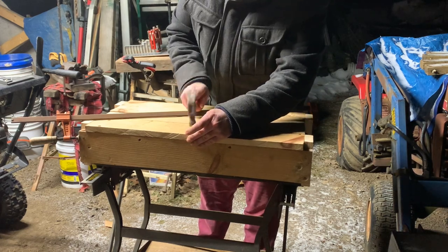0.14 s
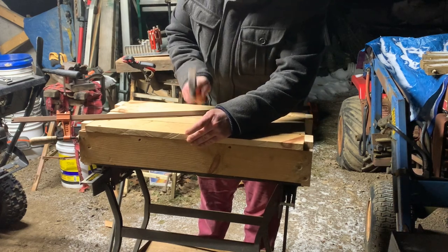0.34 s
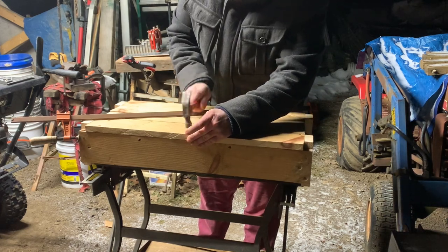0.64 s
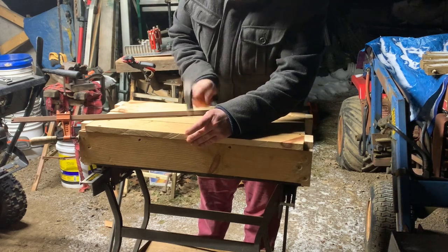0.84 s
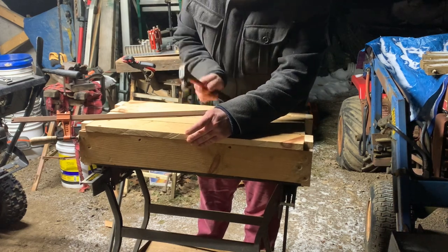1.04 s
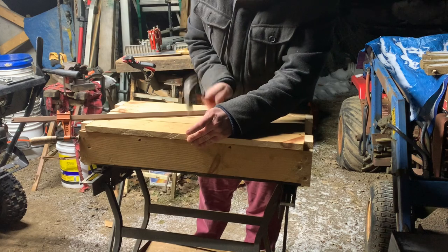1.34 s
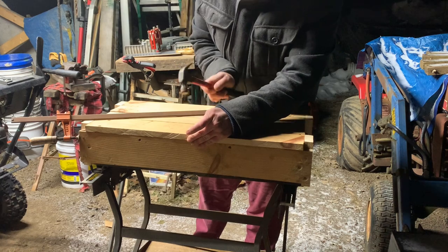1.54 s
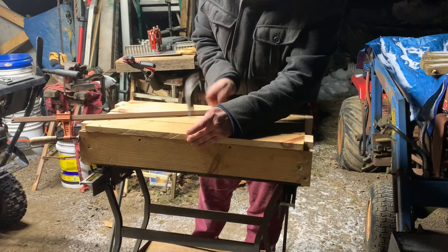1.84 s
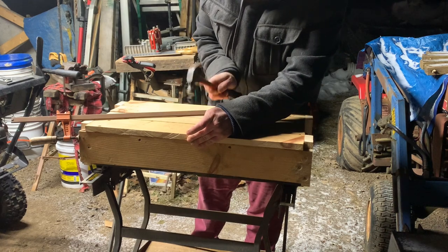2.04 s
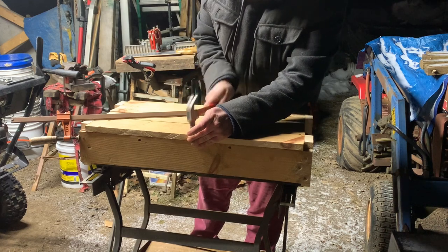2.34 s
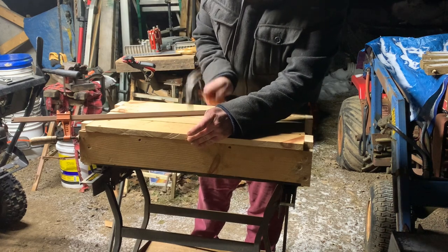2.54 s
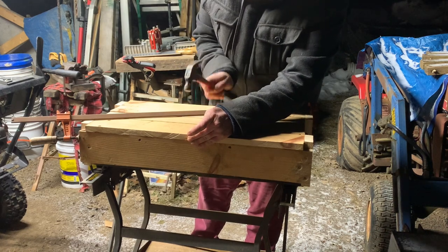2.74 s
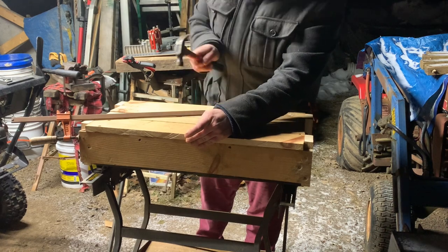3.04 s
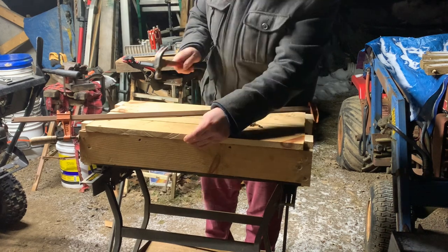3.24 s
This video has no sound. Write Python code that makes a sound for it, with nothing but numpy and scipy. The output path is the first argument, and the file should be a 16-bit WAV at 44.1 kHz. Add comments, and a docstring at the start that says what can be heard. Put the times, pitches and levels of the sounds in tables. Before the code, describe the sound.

A hammer drives a nail into wooden boards with rapid, loud, steady knocks in a garage.

```python
"""In a garage, one microphone hears quiet air, bench rumble and the tail of a blow struck just before.
A hammer drives a nail into boards on a folding workbench, four blows a second: shaped noise for the steel
crack, dying sines for the wood and the garage's resonances, a bench rebound, and decaying noise for the echo.
Between blows the rocking boards bump; as the nail sinks the knock gives way to a deep thud.
After the last blows loose hardware ticks and the rumble dies; a limiter holds the peaks throughout."""
import sys
import numpy as np
from scipy import signal
from scipy.fft import rfft, irfft
from scipy.io import wavfile
from scipy.ndimage import uniform_filter1d

SR = 44100
rng = np.random.default_rng(int(sys.argv[2]) if len(sys.argv) > 2 else 0)


def wav_out(sig):
    """Save sig, one row per channel (or a flat mono array), as 16-bit PCM at SR to the path in sys.argv[1]."""
    wavfile.write(sys.argv[1], SR, np.round(np.clip(np.atleast_2d(sig).T, -1, 1) * 32767).astype(np.int16))


N = 149940  # samples in the scene
LENGTH = 32768  # samples in one sound
T = np.arange(LENGTH) / SR

# Background spectra, relative: frequency_hz, level_db
AIR_SPECTRUM = [(20, -17.5), (55, -4.5), (120, -10), (300, -11), (500, -12.5), (700, -20.5), (1200, -19.5),
                (2500, -27), (4500, -29), (7200, -31), (8500, -49.5), (16000, -68)]
RUMBLE_SPECTRUM = [(20, -21), (40, -13.5), (58, 1), (100, -3.5), (200, -13.5), (400, -24), (1000, -32),
                   (4000, -54)]
AIR_DB, RUMBLE_DB = -58, -43  # rms levels, the rumble's before its fade
RUMBLE_END_S, RUMBLE_FADE_S = 2.91, 0.19

# Hammer blows: start_s, rebound_db, rebound_hz, then the tone of the blow at the six BLOW_TONE_HZ:
# thud_db, body_db, knock_db, clack_db, crack_db, tick_db
BLOWS = [(-.11, -70, 302, 4, -10, 1, -0.5, -5.5, -10), (0.14, -14, 408, 3, -2.5, 0.5, 0, -5, -6.5),
         (.3877, -28.5, 385, 3.5, -2, 1.5, 1.5, -5, -7.5), (0.622, -13, 278, 3, -2.5, 1.5, 2.5, -4, -10),
         (.8741, -15, 284, 0.5, -2.5, 1.5, 3.5, -8.5, -7), (1.1361, -15.5, 296, -1, -1.5, 1, 2, -10, -8),
         (1.375, -25, 322, 3, -2, 1, -0.5, -2.5, -12), (1.6257, -9.5, 342, 1, -3, -1.5, -0.5, -3.5, -4.5),
         (1.8738, -5, 370, 2.5, -3, -4.5, -2, -2.5, -3),
         (2.1146, -7, 327, 4.5, -3.5, -7.5, -2.5, -4.5, -1.5),
         (2.3485, -2, 308, 5.5, -3.5, -7, -4, -4, -0.5), (2.5814, -2.5, 301, 5.5, 0, -4.5, -3.5, -3.5, 1),
         (2.8119, -23.5, 361, 7.5, 6.5, 1, 4.5, -3, 0)]
# Where the tone of a blow is set: frequency_hz
BLOW_TONE_HZ = [300, 680, 1200, 2100, 6500, 9500]
LIKENESS = .85  # how much of its fine pattern a blow hands to the next, 0 to 1

# Colour of steel meeting the nail head: frequency_hz, gain_db
CRACK_COLOUR = [(100, -20.5), (500, -10.5), (1200, 4.5), (2100, 1.5), (3200, 7), (4500, 5), (6700, 9),
                (8300, 1), (10500, -3), (13000, -8), (16000, -14)]
# Strengths before that colour
CRACK_DB, CRACK_T60_S = 11, .011
SPLINTER_DB, SPLINTER_T60_S = 3, 0.061
# The first, duller reflection off the floor
FLOOR_ECHO_S, FLOOR_ECHO_DB, FLOOR_ECHO_HZ = .004, -2.5, 2520

# Modes of the nailed boards: pitch_hz, relative level_db, t60_s
WOOD_MODES = [(149.2, -28, 0.18), (268.7, -26, 0.12), (382.3, -24, .12), (507, -18, 0.042),
              (708.6, -14.5, 0.06), (932, -18.5, 0.032), (1198, -9, 0.043), (1501.6, -13.5, 0.042),
              (1769, -13, 0.031), (2187, -17, 0.023), (2540, -13.5, .025), (2906, -7.5, 0.021),
              (3910, -6.5, .02), (5467, -9.5, 0.015), (6864, -5, 0.01)]
WOOD_DB, WOOD_RISE_S = 1, .001

# Colour of the garage echo: frequency_hz, gain_db
ROOM_COLOUR = [(80, -6), (150, 5), (270, 19.5), (450, 21), (600, 18.5), (850, 19), (1180, 21.5),
               (1600, 17.5), (2200, 12), (3000, 13), (4500, 10.5), (7000, 8), (9000, 1), (12000, -9.5),
               (15500, -14.5)]
# Decay of the garage echo: frequency_hz, t60_s
ROOM_DECAY = [(150, .3), (400, 0.23), (1100, 0.16), (2800, 0.18), (7000, 0.16), (15000, 0.13)]
WALL_S, BUILD_S, NEAR_DB = .013, 0.0069, -9.5  # wall delay, build-up, and level before the walls answer
FADE_FROM_S = .032
LINGER_DB, LINGER_T60_S, LINGER_HZ = -25.5, 1, 4500  # faint long tail, weaker above LINGER_HZ
ROOM_DB, WOOD_ROOM_DB = 5, -33  # room gain for the blow and for its wood ring

# Resonances of the garage, narrow tones after each blow: pitch_hz, relative level_db, t60_s
GARAGE_MODES = [(382.6, -38.5, 0.62), (461, -22.5, 0.24), (691, -32, 0.18), (1158, -21.5, .25),
                (1105.6, -18.5, 0.17), (1265, -30.5, 0.37), (1442, -30, 0.09), (1518, -28, 0.12),
                (1883, -26.5, 0.2), (2670, -34.5, 0.083), (2927, -33, 0.25), (3240, -36, .19)]

# The bench rebounds after a blow: delay, half length, relative level and decay of its ring
REBOUND_S, REBOUND_WIDTH_S, REBOUND_RING_DB, REBOUND_T60_S = .0212, .0026, -14, 0.086
SWAY_DB, SWAY_HZ, SWAY_WIDTH_S = -21, 116, .009  # the heavy frame, level relative to the rebound

# Dull bumps of the rocking boards: start_s (centre of the push), level_db, pitch_hz
BUMPS = [(0.086, -39, 190), (.362, -29, 141), (.378, -29, 231), (.598, -24, 126), (.614, -28, 316),
         (.735, -30, 127), (.772, -31, 150), (.814, -20.5, 126), (.83, -28.5, 200), (0.859, -26.5, 167),
         (.955, -30, 236), (0.98, -29.5, 132.2), (1.026, -35.5, 139), (1.33, -43, 121), (1.348, -30.5, 456),
         (1.36, -30, 660), (1.76, -33, 151), (1.823, -33, 207), (1.851, -23, 167), (1.949, -22.5, 257),
         (1.987, -17, 185), (2.012, -33, 268), (2.028, -27.5, 111), (2.059, -41, 114), (2.108, -32.5, 330),
         (2.261, -31, 192), (2.285, -28, 170), (2.312, -29.5, 100), (2.716, -33, 205), (2.747, -36.5, 150),
         (2.797, -29, 237), (3.074, -49.5, 124), (3.124, -45, 139.6)]
BUMP_WIDTH_S, BUMP_SCUFF_DB, BUMP_ROOM_DB = .0065, -0.5, -30

# Light rattles of loose hardware: start_s, relative level_db
RATTLES = [(2.713, -37.5), (2.943, -34), (2.98, -36), (3.013, -36.5), (3.038, -49)]
# Colour of a rattle: frequency_hz, gain_db
RATTLE_COLOUR = [(200, 8.5), (1100, 2), (3000, 8.5), (7000, -0.5), (10000, -14), (15000, -32.5)]
RATTLE_T60_S, RATTLE_ROOM_DB = 0.066, -15.5

# At the microphone: limiter threshold and recovery, soft overload (full scale = 1), pass band
LIMIT_DB, RECOVER_DB_PER_S, CEILING = -6.5, 598.5, 0.91
LOW_CUT_HZ, EDGE_HZ = 22, 15800


def amp(db):
    """Decibels to gain."""
    return 10 ** (np.asarray(db) / 20)


def dying(t60):
    """Exponential decay, 60 dB down after t60 seconds."""
    return np.exp(-np.log(1000) * T / t60)


def unit(x):
    """Scales to energy one."""
    return x / np.sqrt(np.sum(x ** 2) + 1e-20)


def read(points, hz):
    """Reads a table on a logarithmic frequency axis."""
    f, value = np.transpose(points)
    return np.interp(np.log(hz + 1), np.log(f + 1), value)


def add(mix, start_s, sound):
    """Adds a sound at a time; what comes before time zero is dropped."""
    at = round(start_s * SR)
    part = mix[max(at, 0):max(at + len(sound), 0)]
    part += sound[max(-at, 0):][:len(part)]


def through(x, response):
    """Convolves, keeping the length."""
    return signal.fftconvolve(x, response)[:len(x)]


def colour(x, points):
    """Causal (minimum-phase) filter with the given spectrum."""
    hz = abs(np.fft.fftfreq(LENGTH, 1 / SR))
    log_gain = np.log(amp(read(points, hz)))
    spectrum = np.exp(np.conj(signal.hilbert(log_gain)))
    response = np.fft.ifft(spectrum).real[:LENGTH // 8]
    return through(x, response)


def level_out(x, size):
    """Evens the broad humps of a noise burst's spectrum, averaging over size bins; energy becomes one."""
    z = rfft(x)
    humps = np.sqrt(abs(uniform_filter1d(abs(z) ** 2, size)) + 1e-12)
    return unit(irfft(z / humps))


def ring(modes):
    """Sum of dying sines of alternating sign."""
    total = np.zeros(LENGTH)
    for k, (hz, db, t60) in enumerate(modes):
        total += (-1) ** k * amp(db) * dying(t60) * np.sin(2 * np.pi * hz * T)
    return total


def noise(points):
    """Steady noise of rms one with the given spectrum."""
    gain = amp(read(points, np.fft.rfftfreq(N, 1 / SR)))
    shaped = irfft(rfft(rng.standard_normal(N)) * gain, N)
    return unit(shaped) * np.sqrt(N)


def background():
    """Quiet shop air, and a low rumble of the shaken bench that dies when the hammering stops."""
    past_end = np.maximum(np.arange(N) / SR - RUMBLE_END_S, 0)
    shaking = np.exp(-past_end / RUMBLE_FADE_S)
    air = amp(AIR_DB) * noise(AIR_SPECTRUM)
    return air + amp(RUMBLE_DB) * shaking * noise(RUMBLE_SPECTRUM)


def hammer():
    """Every blow cracks on the nail, rings the boards and fills the garage; its noise pattern drifts."""
    out = np.zeros(N)
    pattern = rng.standard_normal((3, LENGTH))  # crack, splinter and garage
    wood = wood_ring()
    resonances = garage_resonances()
    for start_s, rebound_db, rebound_hz, *tone_db in BLOWS:
        fresh = rng.standard_normal((3, LENGTH))
        pattern = LIKENESS * pattern + np.sqrt(1 - LIKENESS ** 2) * fresh
        crack = nail_crack(pattern[0], pattern[1])
        walls = garage(pattern[2])
        echo = amp(ROOM_DB) * walls + amp(WOOD_ROOM_DB) * through(wood, walls) + resonances
        blow = colour(off_the_floor(crack) + wood + echo, list(zip(BLOW_TONE_HZ, tone_db)))
        add(out, start_s, blow + rebound(rebound_db, rebound_hz))
    return out


def nail_crack(steel_noise, splinter_noise):
    """Steel on the nail head: a very short noise burst over a longer splintering one."""
    contact = amp(CRACK_DB) * unit(steel_noise * dying(CRACK_T60_S))
    contact += amp(SPLINTER_DB) * unit(splinter_noise * dying(SPLINTER_T60_S))
    even = np.linalg.norm(contact) * level_out(contact, size=600)
    return colour(even * (T < T[-1] / 2), CRACK_COLOUR)


def off_the_floor(x):
    """The sound and its dull reflection a moment later."""
    dull = signal.sosfilt(signal.butter(1, FLOOR_ECHO_HZ, fs=SR, output="sos"), x)
    return x + amp(FLOOR_ECHO_DB) * np.interp(T - FLOOR_ECHO_S, T, dull, left=0)


def wood_ring():
    """The nailed boards ring in dying modes with a soft onset."""
    return amp(WOOD_DB) * ring(WOOD_MODES) * (1 - np.exp(-T / WOOD_RISE_S))


def garage(pattern):
    """Weak near reflections, then the walls: a plateau, a quick decay and a faint lingering tail."""
    hz, t, z = signal.stft(pattern, SR, nperseg=256)
    late = np.maximum(t - FADE_FROM_S, 0) * np.log(1000)
    fade = np.exp(-late / read(ROOM_DECAY, hz)[:, None])
    linger = amp(LINGER_DB) * np.exp(-late / LINGER_T60_S)
    linger = linger / (1 + (hz[:, None] / LINGER_HZ) ** 2)
    tail = signal.istft(z * np.hypot(fade, linger), SR, nperseg=256)[1][:LENGTH]
    swell = np.interp(T, [WALL_S, WALL_S + BUILD_S], [amp(NEAR_DB), 1])
    even = level_out(tail * swell, size=70)
    return colour(even * (T < T[-1] - .1), ROOM_COLOUR)


def garage_resonances():
    """Narrow tones of the garage that linger after each blow, delayed and built up like the wall echo."""
    return np.interp(T - WALL_S, T, ring(GARAGE_MODES) * np.minimum(T / BUILD_S, 1))


def rebound(db, hz):
    """The bench springs back with a short boom that rings on, over a low sway of its frame."""
    u = T - REBOUND_S
    boom = np.exp(-(u / REBOUND_WIDTH_S) ** 2)
    decay = np.exp(-np.log(1000) * abs(u) / REBOUND_T60_S)
    after = amp(REBOUND_RING_DB) * (u > 0) * (1 - boom) * decay
    sway = amp(SWAY_DB) * np.exp(-(u / SWAY_WIDTH_S) ** 2) * np.sin(2 * np.pi * SWAY_HZ * u)
    return amp(db) * ((boom + after) * np.sin(2 * np.pi * hz * u) + sway)


def bumps():
    """Soft low pushes with a dull scuff, as the boards rock on the bench."""
    out = np.zeros(N)
    lead = 4 * BUMP_WIDTH_S  # room for the push to swell
    u = T - lead
    for start_s, db, hz in BUMPS:
        push = np.exp(-(u / BUMP_WIDTH_S) ** 2) * np.sin(2 * np.pi * hz * u)
        low_pass = signal.butter(3, hz * 2.2, fs=SR, output="sos")
        scuff = signal.sosfilt(low_pass, rng.standard_normal(LENGTH))
        scuff = unit(scuff * np.exp(-(u / BUMP_WIDTH_S / 2) ** 2)) * np.linalg.norm(push)
        add(out, start_s - lead, amp(db) * (push + amp(BUMP_SCUFF_DB) * scuff))
    return out + amp(BUMP_ROOM_DB) * through(out, garage(rng.standard_normal(LENGTH)))


def rattles():
    """Loose hardware settles in a few light ticks of decaying, coloured noise."""
    out = np.zeros(N)
    for start_s, db in RATTLES:
        burst = rng.standard_normal(LENGTH) * dying(RATTLE_T60_S)
        add(out, start_s, amp(db) * colour(burst, RATTLE_COLOUR) / 2)
    return out + amp(RATTLE_ROOM_DB) * through(out, garage(rng.standard_normal(LENGTH)))


def scene():
    """All sources at one microphone."""
    return (hammer() + bumps() + rattles() + background())[None]


def record(dry):
    """A fast limiter, soft overload, a low cut and the band limit."""
    power_db = 10 * np.log10(abs(uniform_filter1d(dry[0] ** 2, size=64)) + 1e-12)
    fall = np.arange(N) * RECOVER_DB_PER_S / SR
    # the held level jumps up with each peak and then falls at the recovery rate
    held_db = np.maximum.accumulate(power_db + fall) - fall
    over_db = np.maximum(held_db - LIMIT_DB, 0)
    held = dry / amp(uniform_filter1d(over_db, size=32))
    held = held / (1 + (held / CEILING) ** 6) ** (1 / 6)  # soft overload
    held = signal.sosfilt(signal.butter(2, LOW_CUT_HZ, "high", fs=SR, output="sos"), held)
    band_limit = signal.firwin(255, EDGE_HZ, window=("kaiser", 8), fs=SR)
    return signal.oaconvolve(held, band_limit[None], "same")


dry = scene()
out = record(dry)
wav_out(out)
```